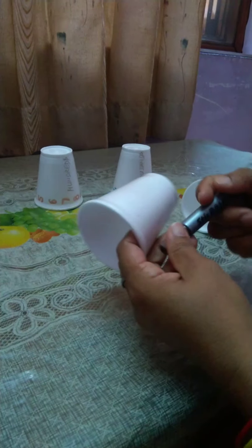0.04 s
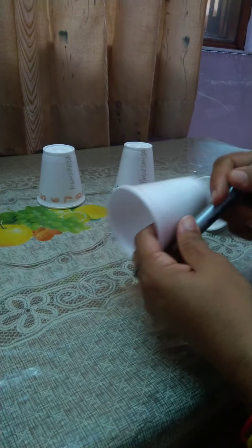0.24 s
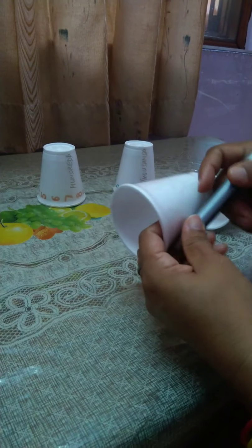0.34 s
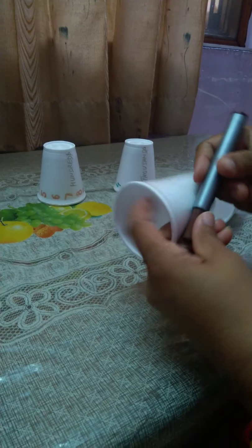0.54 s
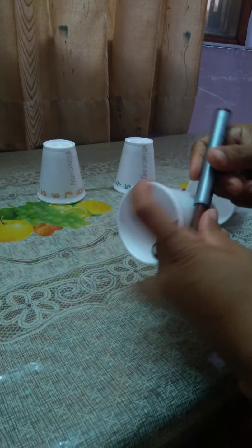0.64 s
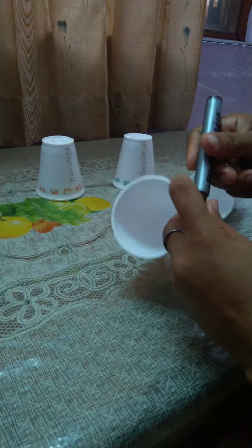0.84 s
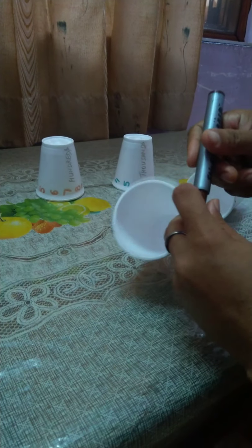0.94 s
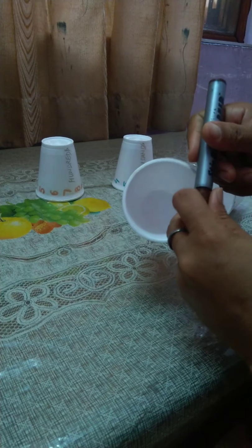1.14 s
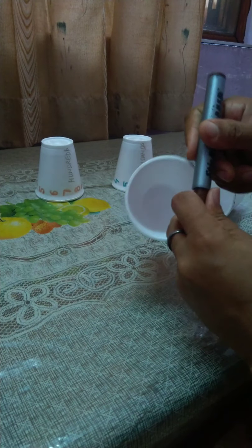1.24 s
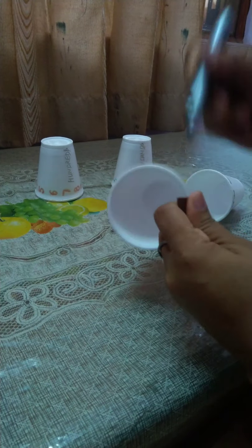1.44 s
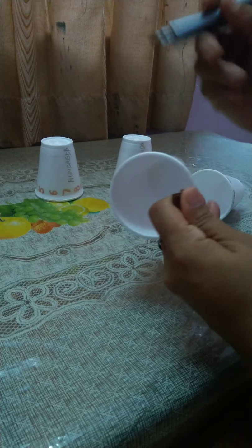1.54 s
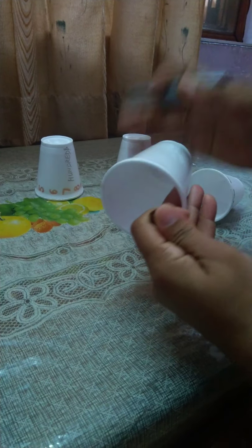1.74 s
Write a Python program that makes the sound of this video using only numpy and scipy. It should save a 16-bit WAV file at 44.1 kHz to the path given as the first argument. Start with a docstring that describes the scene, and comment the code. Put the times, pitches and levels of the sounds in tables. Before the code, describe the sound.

Foam cup handled up close: raspy squeaky rubs, hollow knocks, then a sharp marker cap pop

```python
"""A low rumble and a soft brush of skin come first, then knocks and rasping rubs as fingers shift on a foam cup.
Each rub is a dense run of tiny random slips, filtered by the foam wall and by the ringing hollow of the cup.
A marker pen knocks and squeaks against it, coarse crackles shudder low, and the pen's cap snaps off with a pop.
Knocks are noise bursts plus damped modes; a low two-tone resonance of room and cup, faint hiss and
a small bare room surround it all."""
import sys
import numpy as np
from scipy import signal
from scipy.fft import rfft, irfft
from scipy.io import wavfile

SR = 44100
rng = np.random.default_rng(int(sys.argv[2]) if len(sys.argv) > 2 else 0)


def dump(signal):
    """Clip the signal to [-1, 1] and save it as 16-bit WAV at the path in sys.argv[1]."""
    limited = np.clip(np.atleast_2d(signal).T, -1, 1)
    pcm = np.round(limited * 32767).astype(np.int16)
    wavfile.write(sys.argv[1], SR, pcm)


N = 79380
TIME, FREQS = np.arange(N) / SR, np.fft.rfftfreq(N, 1 / SR)


def amp(db):
    """Decibels to gain."""
    return 10 ** (np.asarray(db) / 20)


def unit(x):
    """Scales to rms 1."""
    return x / np.sqrt(np.mean(x ** 2) + 1e-20)


def read(points, hz=FREQS):
    """Reads a table along a log-frequency axis."""
    f, value = np.transpose(points)
    return np.interp(np.log(hz + 1), np.log(f + 1), value)


def level_curve(points):
    """Gain over time from a table of times and decibels."""
    return amp(np.interp(TIME, *np.transpose(points)))


def colour(x, db):
    """Filters by a gain curve in dB."""
    return irfft(rfft(x) * amp(db), N)


def noise(db):
    """Steady noise of a given spectrum, at rms 1."""
    return unit(colour(rng.standard_normal(N), db))


def wander(rate_hz):
    """Random motion of rms 1, mostly slower than rate_hz."""
    return noise(-10 * np.log10(1 + (FREQS / rate_hz) ** 4))


def ring(x, modes):
    """Drives a set of damped modes, each a cosine that decays by 60 dB in its t60."""
    t = TIME[:SR // 3]
    body = sum(amp(db - 60 * t / t60) * np.cos(2 * np.pi * hz * t) for hz, db, t60 in modes)
    return signal.fftconvolve(x, body)[:N]


# rubs on the foam: start_s, length_s, rise_s, rasp_db, hollow_db, crispness_db
RUBS = [(0.262, 0.042, 0.038, -40.5, -39, 4.5), (0.372, 0.019, 0.011, -41.5, -60, 16.5),
        (0.393, 0.046, 0.017, -34, -45, 16), (0.447, 0.094, 0.0068, -49, -62.5, 13),
        (0.545, 0.015, 0.0057, -38, -43, 16.5), (0.558, 0.046, 0.013, -32.5, -41, 10.5),
        (0.604, 0.02, 0.011, -31, -41, 8.5), (.8595, 0.019, 0.00078, -37.5, -42.5, 9.5),
        (0.871, 0.051, 0.016, -32, -43.5, 13.5), (0.986, 0.027, 0.0078, -37.5, -47, 8),
        (1.247, 0.067, 0.026, -51.5, -54, 1), (1.332, 0.058, 0.041, -43, -63, 6.5)]
# spectrum of the rasp: pitch_hz, level_db (per Hz)
RASP = [(100, -34), (400, -32), (1400, -13), (2300, -3.5), (4000, -1), (7000, -1), (11000, 3),
        (16000, -12.5)]
RELEASE_S = 0.0058


def rubs():
    """Slips swell with each push of the fingers, rasp in the wall and sound the hollow."""
    out = np.zeros((2, N))
    foam = read(RASP) + wall()
    for start, length, rise, rasp_db, hollow_db, crisp_db in RUBS:
        t = TIME - start
        drive = slips()
        push = np.clip(t / rise, 0, 1) * np.exp(-np.maximum(t - length, 0) / RELEASE_S)
        rasp = amp(rasp_db) * unit(colour(drive, foam + treble(crisp_db)))
        body = amp(hollow_db) * unit(hollow(drive))
        out += slide(push * (rasp + body))
    return out


SLIPS_PER_S, SLIP_SPREAD_DB, JUDDER_DB = 4500, 3, 1.6


def slips(per_s=SLIPS_PER_S):
    """A dense run of tiny stick-slip releases of uneven size, juddering in level."""
    size = amp(SLIP_SPREAD_DB * np.minimum(rng.exponential(1, N), 3))
    sign = rng.choice([-1., 1.], N)
    happens = rng.random(N) < per_s / SR
    return size * sign * happens * amp(JUDDER_DB * wander(120))


def treble(db, middle_hz=8700):
    """Tilts the spectrum by db in all: half up in the top, half down below."""
    return db / (1 + (middle_hz / (FREQS + 1)) ** 4) - db / 2


# peaks and dips of the foam wall: pitch_hz, width_hz, lift_db
WALL = [(1460, 180, 7.5), (1830, 280, 11), (2260, 180, -1.5), (2647, 395, 11), (4590, 4500, 10),
        (9700, 440, 5)]


def wall():
    """Lift in dB from the resonances of the foam wall."""
    return sum(db / (1 + (2 * (FREQS - hz) / width) ** 2) for hz, width, db in WALL)


# ringing of the cup: pitch_hz, level_db, t60_s
CUP = [(698, 2, 0.0069), (836, -7.5, 0.011), (981, -5.5, 0.021), (1230, -11, 0.027), (1707, -9, 0.01)]
HOLLOW_EDGE_HZ = 740


def hollow(x, dip_hz=1450, dip_q=4):
    """The hollow of the cup rings, thinned below its edge and with a dip above the main cluster."""
    rung = ring(soften(x), CUP)
    dipped = signal.lfilter(*signal.iirnotch(dip_hz, dip_q, SR), rung)
    return signal.sosfilt(signal.butter(5, HOLLOW_EDGE_HZ, "high", fs=SR, output="sos"), dipped)


def soften(x, edge_hz=1460):
    """Skin cushions a push, rolling off its highs."""
    return signal.lfilter(*signal.butter(2, edge_hz, fs=SR), x)


SLIDE_HZ = 6  # passes there and back per second


def slide(x):
    """A sliding finger passes from one place of contact to another, so the peaks and dips shift."""
    turn = np.pi / 4 * (1 + np.sin(2 * np.pi * (SLIDE_HZ * TIME + rng.random())))
    return spot(x * np.cos(turn) ** 2) + spot(x * np.sin(turn) ** 2)


RIPPLE_DB, RIPPLE_TOP_DB = 7, 6.5  # ripple depth; ceiling on the peaks before levelling


def spot(x, depth_db=RIPPLE_DB, apart=1.0):
    """Each contact place has its own low peaks and deep dips, a little different at each microphone."""
    knots = np.linspace(0, SR / 2, 100)
    draws = rng.standard_normal((5, len(knots)))
    ripples = np.array([np.interp(FREQS, knots, d) for d in draws])
    ripples = ripples * FREQS / (FREQS + 1500)  # weak in the lows
    mixed = (ripples[0] + apart * ripples[1:3]) / np.sqrt(1 + apart ** 2)  # shared and separate parts
    gain = amp(np.minimum(depth_db * mixed, RIPPLE_TOP_DB))
    phase = np.exp(1j * apart * ripples[3:])
    return irfft(rfft(x) * unit(gain) * phase, N)


# knocks of pen and fingers on the cup, drives before trim: start_s, tick_db, hollow_db, thump_db
KNOCKS = [(0.2193, -37.5, -33.5, -52), (0.238, -35, -32.5, -67), (0.5492, -36, -50, -69),
          (0.8595, -24.5, -19, -28), (0.8815, -20, -31, -34), (1.0583, -27.5, -26.5, -40.5),
          (1.0651, -33, -53, -33), (1.128, -36, -60, -41), (1.4437, -34.5, -26, -58),
          (1.4554, -21.5, -14, -28.5)]
# spectrum of the foam crunch: pitch_hz, level_db (per Hz)
TICK = [(200, 13.5), (1500, -6.5), (5300, 19.5), (7200, 3.5), (9000, 19.5), (11000, 21.5), (13000, 10)]
# dull give of the cup in the hand: pitch_hz, level_db, t60_s
THUMP = [(148.2, -4.5, 0.34), (177.7, 1.5, 0.089), (284, -17, 0.0056)]
TICK_RISE_S, TICK_FALL_S = 0.0003, 0.00088


def knocks(hollow_db=-2, thump_db=-4):
    """Each contact is a short crunch of foam and a push that rings the cup."""
    out = np.zeros((2, N))
    crunch = read(TICK) + wall()
    blow, thump = np.zeros((2, N))
    for s, tick_db, cup_db, low_db in KNOCKS:
        t = np.maximum(TIME - s, 0)
        burst = np.minimum(t / TICK_RISE_S, 1) * np.exp(-t / TICK_FALL_S)
        tick = amp(tick_db) * np.std(burst) * unit(burst * noise(crunch))
        out += spot(tick, depth_db=2)
        blow[round(s * SR)] = amp(cup_db + hollow_db)
        thump[round(s * SR)] = amp(low_db + thump_db)
    return out + .5 * (hollow(blow) + ring(soften(thump), THUMP))


# the marker cap slips over its catch in quick snaps: start_s, drive_db
SNAPS = [(1.4556, -19), (1.4567, -18), (1.4581, -24)]
# first the low airy tail of the pop, then the ringing of the plastic cap: pitch_hz, level_db, t60_s
CAP = [(523, -12, .25), (2800, -22, 0.0041), (5200, -9.5, 0.0098), (5650, -21.5, 0.012), (9000, -9, 0.0056),
       (10060, -5, 0.0044), (11100, -8, 0.0023)]
CAP_EDGE_HZ = 11700


def cap():
    """The cap comes off the marker: a few sharp snaps ring the plastic and leave the pop's low tail."""
    clicks = np.zeros(N)
    for s, db in SNAPS:
        clicks[round(s * SR)] = amp(db)
    rung = signal.lfilter(*signal.butter(4, CAP_EDGE_HZ, fs=SR), ring(clicks, CAP))
    return spot(rung, depth_db=-1.5)


# low rough shudders, a hard push on the wall and then the tail of the cap pop: start_s, length_s, level_db
SHUDDERS = [(0.861, 0.052, -46), (1.456, 0.002, -45)]
# spectrum of the shudder: pitch_hz, level_db (per Hz)
SHUDDER = [(60, -12), (190, 4), (520, 7.5), (1000, -15.5), (2000, -18)]
SHUDDER_FALL_S, CRACKLES_PER_S = 0.037, 600


def shudders():
    """Coarse, low crackles that start at once and die away: a hard push on the wall, then the pop's tail."""
    level = np.zeros(N)
    for start, length, db in SHUDDERS:
        fall = np.exp(-np.maximum(TIME - start - length, 0) / SHUDDER_FALL_S)
        level += amp(db) * (TIME > start) * fall
    return level * unit(colour(slips(CRACKLES_PER_S), read(SHUDDER)))


# small squeaks of the pen: start_s, length_s, first_hz, last_hz, pitch_wander_hz (rms), level_db
SQUEAKS = [(1.375, .034, 1886, 2630, 174, -49.5)]


def squeaks():
    """Brief glides where the pen catches, roughened by fast random pitch."""
    out = np.zeros(N)
    for start, length, first_hz, last_hz, width, db in SQUEAKS:
        u = np.clip((TIME - start) / length, 0, 1)
        pitch_hz = first_hz + (last_hz - first_hz) * u + width * wander(1000)
        turn = 2 * np.pi * np.cumsum(pitch_hz) / SR
        out += amp(db) * np.sin(np.pi * u) * np.sqrt(2) * np.sin(turn)
    return out


# skin brushing the cup and pen: start_s, length_s, level_db, treble_db
BRUSHES = [(0.056, 0.029, -56.5, 27), (0.101, 0.073, -56.5, -9.5), (0.178, 0.22, -52, -12.5),
           (0.735, 0.13, -55.5, -14.5), (1.126, 0.34, -56.5, -13.5), (1.458, 0.2, -58.5, 22),
           (1.65, 0.12, -65.5, 36)]
# spectrum of the skin: pitch_hz, level_db (per Hz)
SKIN = [(300, -46), (1500, -14), (2800, -9), (5200, 7), (7800, -6.5), (10200, 18.5), (12500, 8.5),
        (16000, 6)]


def brushes():
    """Skin slides lightly, in soft arches of grainy hiss."""
    out = np.zeros((2, N))
    for start, length, db, treble_db in BRUSHES:
        arch = np.sin(np.pi * np.clip((TIME - start) / length, 0, 1))
        hiss = unit(colour(slips(), read(SKIN) + treble(treble_db)))
        out += slide(amp(db) * arch * hiss)
    return out


# spectrum of the rumble: pitch_hz, level_db (per Hz)
RUMBLE = [(22, -38), (38, -25.5), (54, 5.5), (95, -6), (135, 0), (190, -5.5), (270, -23.5), (420, -34.5),
          (900, -42), (4000, -68)]
# rumble fader, before the spread and pan: time_s, level_db
RUMBLE_LEVEL = [(0, -58), (.12, -50), (.27, -49.5), (.48, -58), (.82, -54.5), (1.0, -57), (1.28, -58.5),
                (1.47, -55.5), (1.66, -61), (1.8, -68)]
# low resonance of room and cup, two tones relative to each other: pitch_hz, level_db
RESONANCE = [(124.5, 2.5), (188.4, -3.5)]
# its fader, swelling around the later knocks, before the pan: time_s, level_db
RESONANCE_LEVEL = [(0, -69), (.9, -70), (1.08, -54), (1.22, -56.5), (1.5, -49.5), (1.6, -56), (1.72, -68.5)]
# spectrum of the hiss: pitch_hz, level_db (per Hz)
AIR = [(400, 6.5), (3000, 3.5), (6000, -3), (7500, 7.5), (9000, -11), (10400, 19), (16000, -33)]


def background(air_db=-74, pan_db=-6, apart=0.52, waver=0.0158):
    """Low rumble, a low two-tone resonance of room and cup that wavers in pitch, and faint hiss."""
    shared = noise(read(RUMBLE))
    separate = np.array([noise(read(RUMBLE)) for _ in range(2)])
    rumble = level_curve(RUMBLE_LEVEL) * (shared + apart * separate)
    resonance = np.zeros(N)
    for hz, db in RESONANCE:
        pitch_hz = hz * (1 + waver * wander(11.6))
        resonance += amp(db) * np.sin(2 * np.pi * np.cumsum(pitch_hz) / SR)
    low = rumble + level_curve(RESONANCE_LEVEL) * unit(resonance)
    hiss = np.array([noise(read(AIR)) for _ in range(2)])
    return low * amp([[pan_db / 2], [-pan_db / 2]]) + amp(air_db) * hiss


# decay of the room: pitch_hz, t60_s
ROOM = [(200, 0.26), (900, 0.34), (5000, 0.33), (9000, 0.29), (16000, 0.56)]
# level of the room tail: pitch_hz, level_db
WET = [(500, -8.5), (1000, -3.5), (3000, -4), (5000, -4.5), (8000, -3), (16000, -14.5)]
# left minus right of the direct sound, at full side: pitch_hz, balance_db
DIRECT_PAN = [(300, -7), (1000, -3), (1750, -1.5), (2600, 4.5), (9500, 5), (13000, 15)]
# left minus right of the room tail, at full side: pitch_hz, balance_db
ROOM_PAN = [(1000, -9), (4000, -9), (10500, -3.5), (13000, 4.5)]
LEFT_LEAD_S = 0.00013  # left ahead of right, at full side


def room(x, side, gap_s=0.0042, table_db=-7, table_fall_s=0.0027):
    """One microphone: direct sound, quick bounces off table and hands, and the tail of the room."""
    # sparse random echoes fade in after the gap, then each band decays at its own pace
    taps = rng.choice([-1., 1.], N) * (rng.random(N) < 1 / 8) * np.clip(TIME / gap_s - 1, 0, 1)
    hz, t, z = signal.stft(taps, SR, nperseg=256)
    t60 = read(ROOM, hz)[:, None]
    tail = signal.istft(z * amp(-60 * t / t60) / np.sqrt(t60), SR, nperseg=256)[1][:N]
    tail = colour(tail / np.linalg.norm(tail), read(WET) + side * read(ROOM_PAN) / 2)[:SR]
    near = (rng.standard_normal(N) * TIME * np.exp(-2 * TIME / table_fall_s))[:SR // 20]
    bounces = amp(table_db) * signal.fftconvolve(x, near / np.linalg.norm(near))[:N]
    direct = colour(x + bounces, side * read(DIRECT_PAN) / 2)
    lead = np.exp(1j * np.pi * FREQS * side * LEFT_LEAD_S)  # half the lead, each way
    direct = irfft(rfft(direct) * lead, N)
    return direct + signal.fftconvolve(x, tail)[:N]


def scene():
    """The handling sounds in the room, over the background."""
    left, right = rubs() + knocks() + cap() + shudders() + squeaks() + brushes()
    return np.array([room(left, 0.81), room(right, -0.81)]) + background()


CUTOFF_HZ = 16100


def record(dry):
    """The band limit of the recorder: a steep low-pass."""
    lowpass = signal.firwin(401, CUTOFF_HZ, window=("kaiser", 8), fs=SR)
    return signal.oaconvolve(dry, lowpass[None], "same")


dry = scene()
out = record(dry)
dump(out)
```